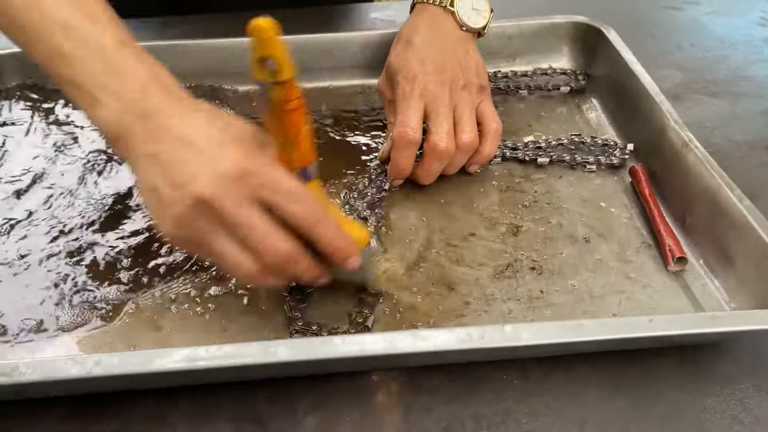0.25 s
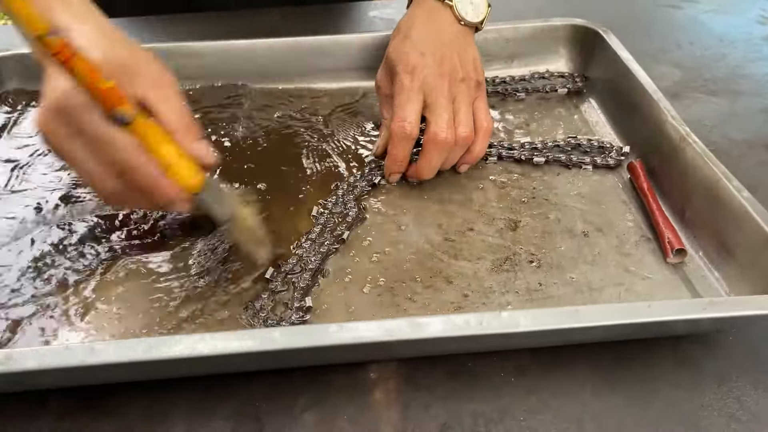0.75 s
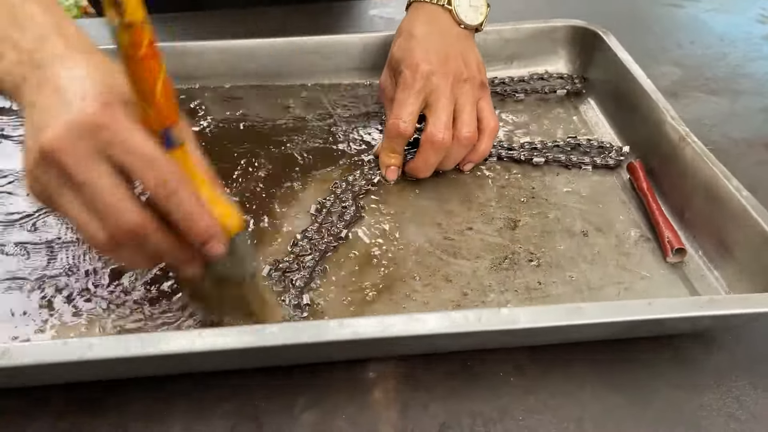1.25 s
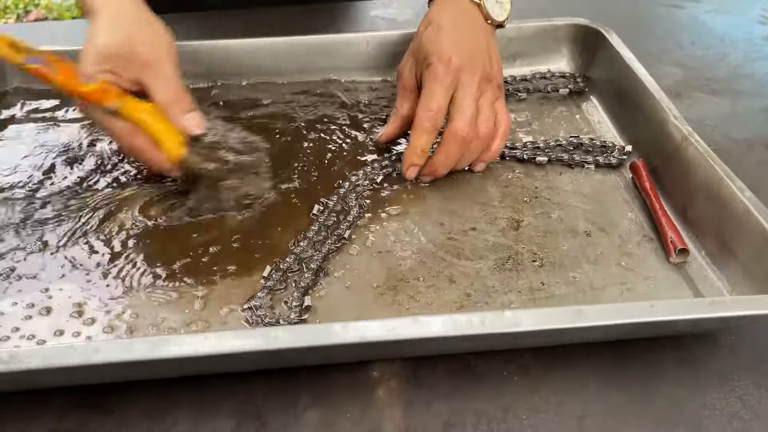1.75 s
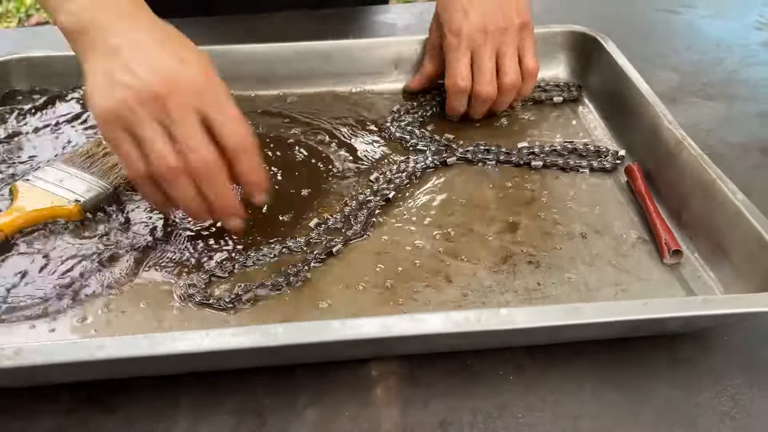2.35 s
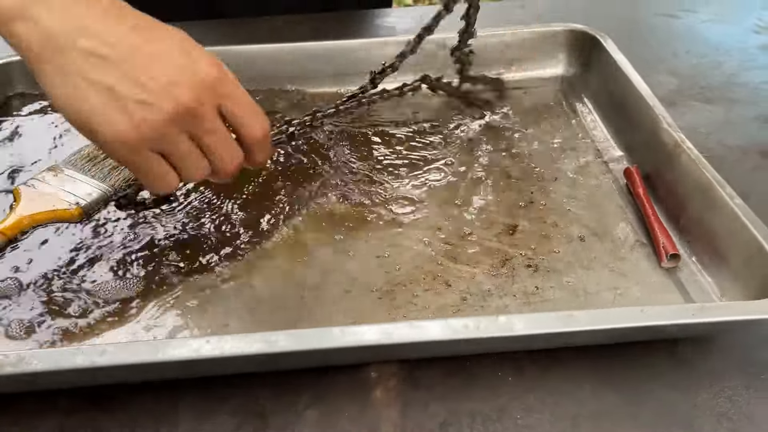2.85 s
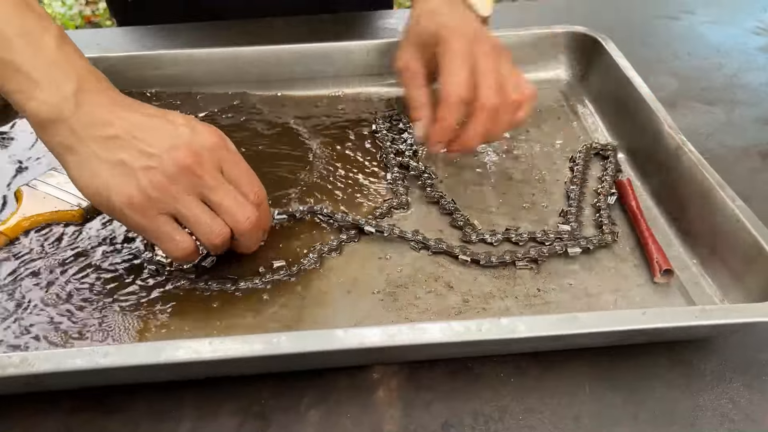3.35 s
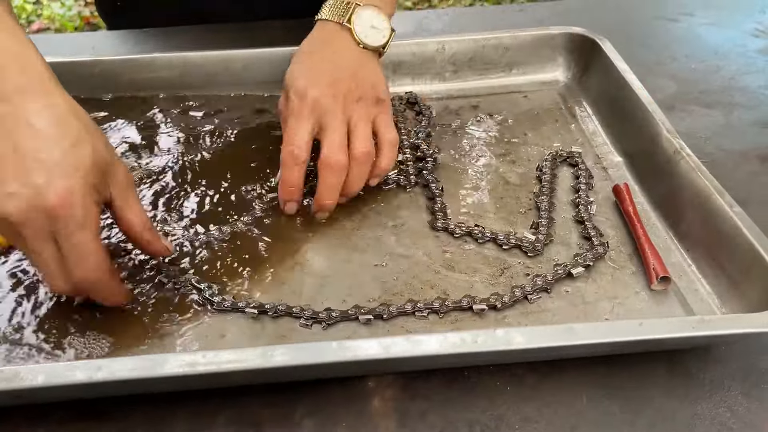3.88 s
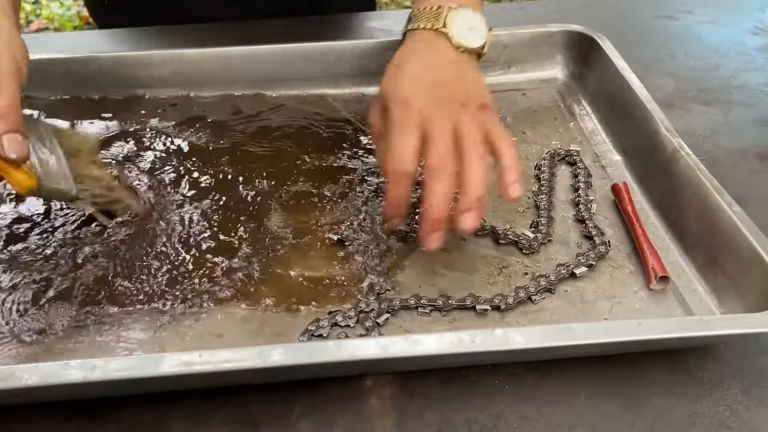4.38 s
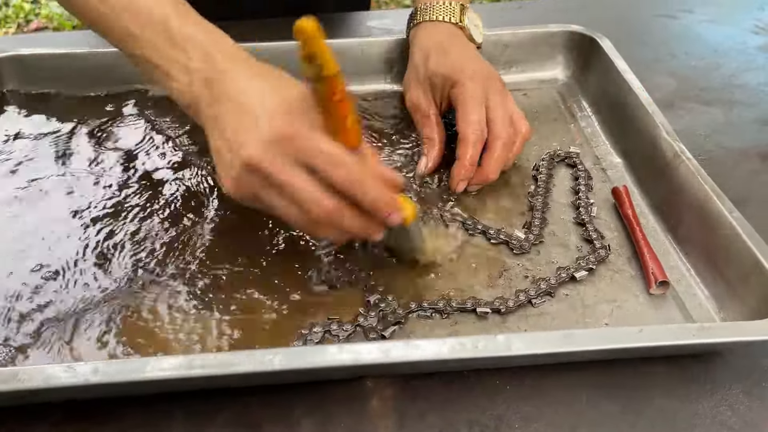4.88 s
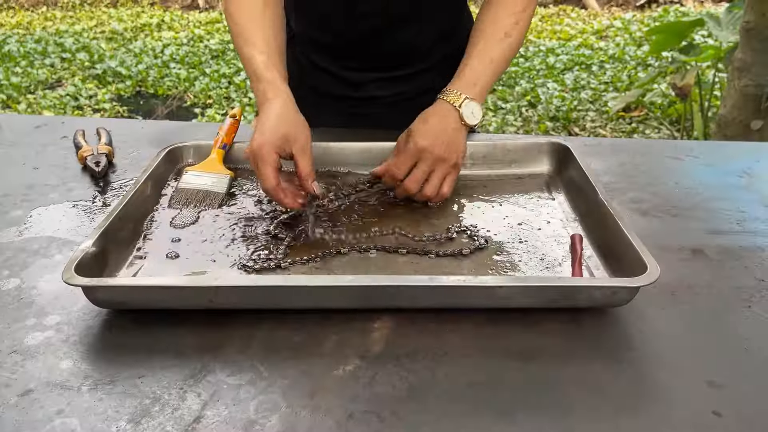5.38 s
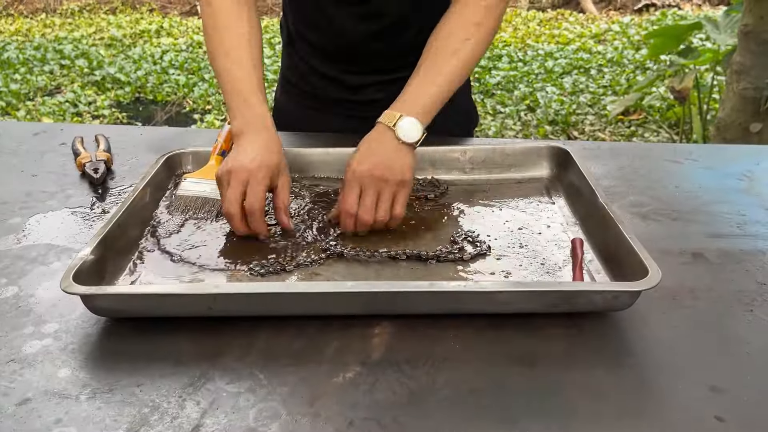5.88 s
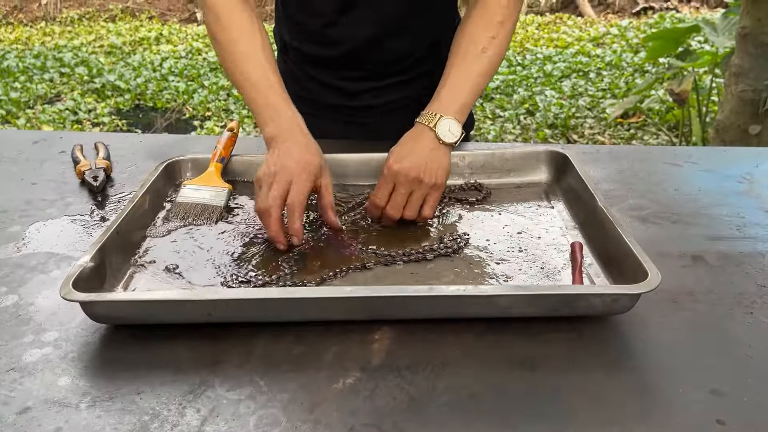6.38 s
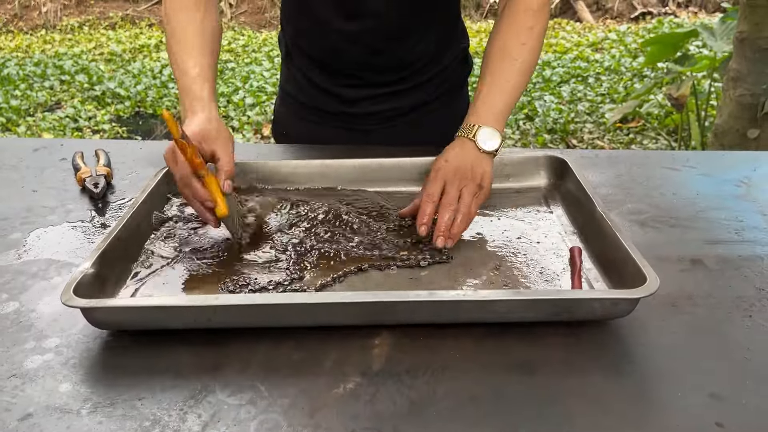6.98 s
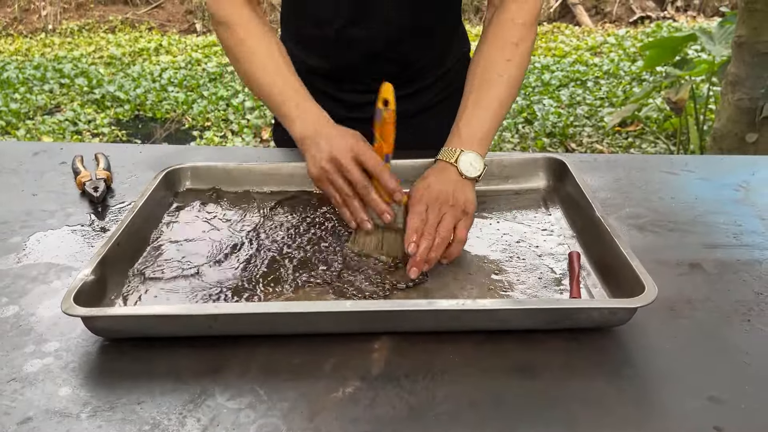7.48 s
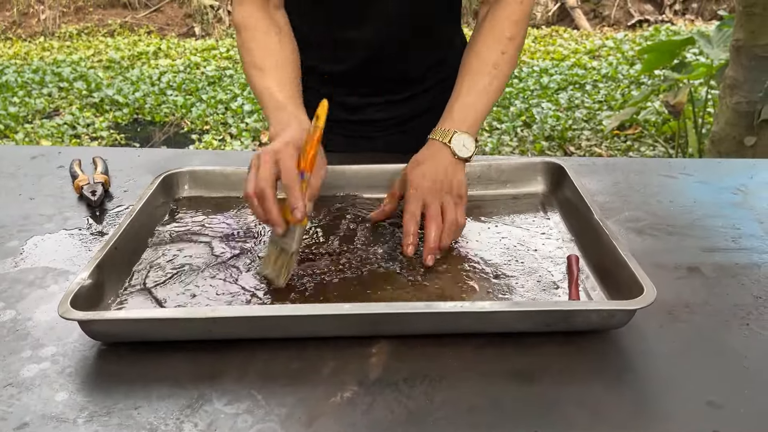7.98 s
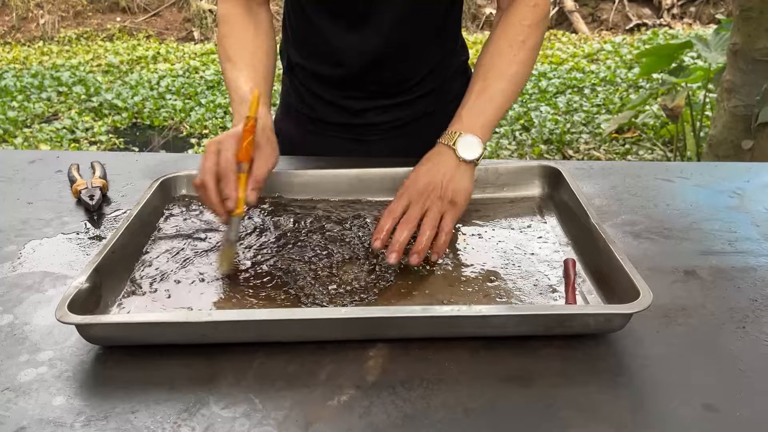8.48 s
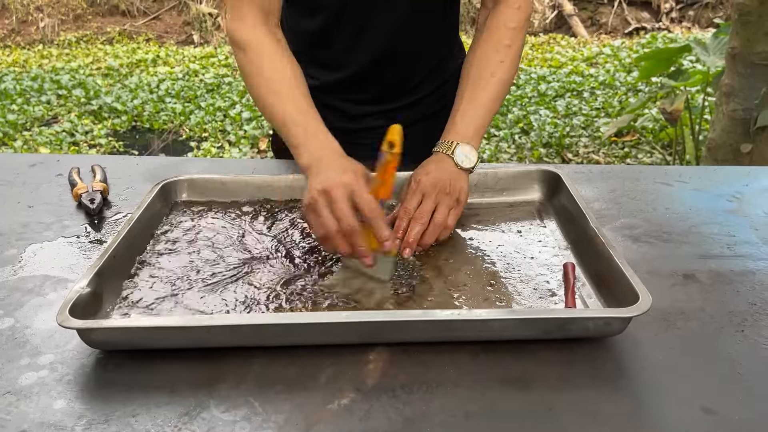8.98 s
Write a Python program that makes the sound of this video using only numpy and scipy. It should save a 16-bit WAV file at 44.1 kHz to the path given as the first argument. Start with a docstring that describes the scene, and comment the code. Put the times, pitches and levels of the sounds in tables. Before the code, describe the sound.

Bristles swish over wet chain links in a thin steel tray, with fine metallic ticks, dull short tray rings and small bubbling plops. Early strokes are light; around two to four seconds the chain clatters as it is moved. Later the scrubbing is steadier and stronger, leaning slightly right, and one faint thin peep passes. Close microphones in open air, with soft rumble and wind.

```python
"""Scrubbing a chain in a wet tray

A stiff brush scrubs a chain in a steel tray of shallow liquid outdoors, and hands drag and drop the chain.
Dense random clicks drive damped modes of the tray floor and of the links and bristles; knocks stand out.
Bubbles are short rising tones, the slosh is low noise; a bird or insect peeps once, a throbbing sine.
Far rumble and wind are shaped noise; the level dips briefly once, as the balance moves from left to right."""
import sys
import numpy as np
from scipy import signal
from scipy.fft import rfft, irfft, next_fast_len
from scipy.io import wavfile

SR = 44100
rng = np.random.default_rng(int(sys.argv[2]) if len(sys.argv) > 2 else 0)


def dump(signal):
    """Clip the signal to [-1, 1] and save it as 16-bit WAV at the path in sys.argv[1]."""
    limited = np.clip(np.atleast_2d(signal).T, -1, 1)
    pcm = np.round(limited * 32767).astype(np.int16)
    wavfile.write(sys.argv[1], SR, pcm)


N = 407484

# links and brush ferrule knocking the tray:
# (time [s], relative peak of the tray ring [dB], relative peak of the link ticks [dB])
KNOCK_EVENTS = [(0.384, -11.5, -21), (0.826, -18, -33), (1.044, -15, -23.5), (1.117, -26.5, -35),
                (1.245, -14.5, -34), (1.338, -24, -42), (1.642, -25.5, -53), (1.748, -33, -53),
                (2.29, -5, -15.5), (2.333, -8.5, -40), (2.406, -16.5, -32), (2.483, -15.5, -25),
                (3.034, -4.5, -15), (3.113, -24, -29), (3.168, -12.5, -21), (3.204, -6, -13),
                (3.255, -10, -20.5), (3.305, -17, -28), (3.325, -12.5, -21), (3.725, -35, -23.5),
                (3.781, -11, -13), (4.135, -11.5, -16), (4.221, -28.5, -49), (4.257, -22.5, -45),
                (4.288, -26.5, -47), (4.314, -28, -29), (4.732, -18.5, -29), (5.184, -6, -13.5),
                (5.327, -18.5, -34), (5.398, -14, -25), (5.503, -7.5, -18), (6.145, -11.5, -19.5),
                (6.773, -19.5, -32.5), (7.2, -22, -32.5), (7.537, -13.5, -18), (7.565, -15.5, -25.5),
                (7.734, -15, -29), (8.176, -16.5, -20.5), (8.722, -14.5, -20)]


def scrubbing():
    """Modal excitation: the same contacts drive two resonators, the tray floor and the links."""
    # modal energy of the tray floor and of the links: (frequency [Hz], relative level [dB per Hz])
    tray_spectrum = [(120, -23), (200, -12), (379, -10.5), (512, 1.5), (661, -7.5), (805, 5.5), (992, -0.5),
                     (1100, 4.5), (1580, 0), (1730, -3), (3200, -19), (4160, -51), (7040, -120)]
    link_spectrum = [(1410, 0.5), (2400, -6), (2660, -6), (5640, -9), (10500, -5.5), (11100, -5),
                     (12400, -16), (14900, -11.5), (15900, -22)]
    # reverberation times, the tray's shortened by the liquid: (frequency [Hz], 60 dB decay time [s])
    tray_decay = [(200, 0.13), (1000, 0.061), (3200, 0.011)]
    link_decay = [(2400, 0.1), (8000, 0.032), (15700, 0.028)]
    ring_db, tick_db = stroke_levels()
    slips = contacts(per_s=4000, spread_db=4.5, clump_db=2.5)
    spot = spots(moves_per_s=300)
    tray = responses(tray_spectrum, tray_decay, count=300, size=4096)
    links = responses(link_spectrum, link_decay, count=900, size=1536)
    _, ring_peak_db, tick_peak_db = np.transpose(KNOCK_EVENTS)
    tray_drive = slips * from_db(ring_db) + knocks(ring_peak_db - 4.5, tray, rattle_s=0.016)
    link_drive = slips * from_db(tick_db) + knocks(tick_peak_db + 4, links, rattle_s=0.014)
    return excite(tray_drive, spot, tray) + excite(link_drive, spot, links)


def stroke_levels():
    """Friction level follows speed: bell-shaped strokes, ticks falling off faster; overlaps add in power."""
    # brush strokes and drags of the chain: (time of the fastest moment [s], rise [s], fall [s],
    # tray ring level [dB], link and bristle tick level [dB])
    strokes = [(0, 0.03, 0.092, -28.5, -26), (0.139, 0.074, 0.23, -34, -32.5),
               (0.293, 0.068, 0.22, -31, -31), (0.393, 0.032, 0.047, -34, -24),
               (0.607, 0.29, 0.087, -36, -34.5), (0.769, 0.058, 0.19, -33.5, -38),
               (1.016, 0.11, 0.11, -34.5, -34), (1.25, 0.083, 0.09, -34, -34),
               (1.557, 0.17, 0.08, -40.5, -36), (1.754, 0.03, 0.2, -52, -42.5),
               (1.961, 0.23, 0.222, -45.5, -48.5), (2.068, 0.1, 0.18, -31.5, -27.5),
               (2.3, 0.032, 0.043, -29.5, -26.5), (2.345, 0.019, 0.03, -25, -32),
               (2.498, 0.18, 0.061, -37.5, -41), (2.604, 0.046, 0.043, -29.5, -28.5),
               (2.697, 0.066, 0.026, -31, -30), (2.787, 0.067, 0.17, -32.5, -24),
               (3.046, 0.019, 0.052, -21.5, -30), (3.162, 0.18, 0.37, -33, -33.5),
               (3.345, 0.03, 0.029, -19, -21.5), (3.44, 0.016, 0.12, -34, -39),
               (3.637, 0.11, 0.23, -29.5, -34.5), (3.785, 0.089, 0.032, -25.5, -21),
               (4.042, 0.093, 0.15, -27, -22), (4.228, 0.015, 0.11, -40, -48),
               (4.36, 0.071, 0.16, -29.5, -19.5), (4.527, 0.015, 0.24, -50.5, -47.5),
               (4.832, 0.12, 0.055, -26.5, -22), (5.013, 0.081, 0.07, -29.5, -23),
               (5.115, 0.04, 0.066, -39, -52), (5.19, 0.064, 0.08, -26, -28),
               (5.431, 0.21, 0.088, -36.5, -40), (5.515, 0.029, 0.089, -19.5, -23),
               (5.71, 0.12, 0.021, -32.5, -31.5), (5.794, 0.091, 0.12, -27.5, -25),
               (5.978, 0.052, 0.52, -33, -36), (6.168, 0.02, 0.035, -23, -24),
               (6.343, 0.14, 0.04, -29.5, -26.5), (6.564, 0.3, 0.067, -32.5, -32),
               (6.828, 0.064, 0.12, -28, -23.5), (7.073, 0.098, 0.12, -29.5, -26),
               (7.237, 0.04, 0.11, -25, -20), (7.445, 0.07, 0.23, -34.5, -35.5),
               (7.55, 0.089, 0.057, -28, -31), (7.765, 0.043, 0.4, -29.5, -26),
               (7.944, 0.22, 0.083, -26.5, -22.5), (8.19, 0.16, 0.3, -27.5, -30),
               (8.395, 0.06, 0.045, -22.5, -22), (8.431, 0.17, 0.1, -29, -33),
               (8.649, 0.051, 0.2, -29.5, -30), (8.799, 0.19, 0.24, -30.5, -30),
               (9.095, 0.071, 0.15, -30, -30.5)]
    ring_swing_db, tick_swing_db = 20.5, 27.5   # below the peak at one rise before it or one fall after it
    rest_ring_db, rest_tick_db = -74.5, -65   # liquid and links never lie quite still
    curve = 2.05   # exponent; 2 = Gaussian bell in time
    peak_s, rise, fall, ring_db, tick_db = np.array(strokes).T[:, :, None]
    t = np.arange(0, N + 64, 64) / SR
    before = (peak_s - t) / np.maximum(rise, 0.005)
    after = (t - peak_s) / np.maximum(fall, 0.005)
    away = np.where(t < peak_s, before, after) ** curve
    layers = (ring_db, ring_swing_db, rest_ring_db), (tick_db, tick_swing_db, rest_tick_db)
    levels = []
    for top, swing, rest in layers:
        power = np.sum(from_db(top - swing * away) ** 2, axis=0) + from_db(rest) ** 2
        levels.append(np.interp(np.arange(N) / SR, t, 10 * np.log10(power)))
    return levels


def contacts(per_s, spread_db, clump_db):
    """Stick-slip as random impulses: slips of bristles and links, uneven in size, in clumps; rms 1."""
    sizes = from_db(spread_db * np.minimum(rng.exponential(1, N), 3.5))
    signs = rng.choice([-1, 1], N)
    happens = rng.random(N) < per_s / SR
    clumps = from_db(clump_db * drift(corner_hz=45))
    return rms_one(sizes * signs * happens * clumps)


def knocks(level_db, rings, rattle_s):
    """Multiple impact: neighbouring links land one after another, swelling quickly, then dying."""
    hardest, fall_db = 0.11, 11.5   # share of the rattle at its hardest; loss over one rattle length [dB]
    jitter = rng.uniform(0, 1, (len(KNOCK_EVENTS), 8))
    jitter[:, 0] = 0   # the first click is on time
    lags = (np.arange(8) + jitter) / 8
    at = ((np.array(KNOCK_EVENTS)[:, :1] + rattle_s * lags) * SR).astype(int)
    clicks = np.zeros(N)
    np.add.at(clicks, np.minimum(at, N - 1), from_db(level_db[:, None] - fall_db * np.abs(lags - hardest)))
    return clicks / np.abs(rings).max(axis=-1).mean()


def spots(moves_per_s):
    """A moving point of excitation: the contact stays on one spot for a moment, then moves on."""
    moves = np.cumsum(rng.random(N) < moves_per_s / SR)
    return rng.integers(0, 12, N)[moves]


def responses(spectrum, t60s, count, size):
    """Modal superposition, evenly dense as in a plate: twelve spots heard left and right, each of energy 1."""
    low, high = spectrum[0][0], spectrum[-1][0]
    hz = (low + (high - low) * (np.arange(count) + rng.random(count)) / count)[:, None]
    t, t60 = np.arange(size) / SR, at_hz(t60s, hz)
    decay = from_db(at_hz(spectrum, hz) - 60 * t / t60) / np.sqrt(t60)   # energy does not depend on t60
    modes = decay * np.exp(2j * np.pi * hz * t)
    # each spot drives some modes far more, and each microphone meets them in another phase
    drive = from_db(rng.normal(0, 2.0, (12, 1, count)))
    shapes = rng.standard_normal((12, 2, count)) + 1j * rng.standard_normal((12, 2, count))
    onset = np.minimum(t / 0.00019, 1)
    rings = ((drive * shapes) @ modes).real * onset
    return rings / np.sqrt(np.sum(rings ** 2, axis=2, keepdims=True))


def excite(clicks, spot, rings):
    """Convolution: every click rings with the impulse response of its spot."""
    size = next_fast_len(N + rings.shape[-1])
    total = sum(rfft(clicks * (spot == k), size) * rfft(ring, size) for k, ring in enumerate(rings))
    return irfft(total, size)[:, :N]


def splashing(per_s, level_db):
    """Bubble resonance: small bubbles follow the strokes in level; a few large ones stand alone."""
    # air pockets closing in the liquid: (time [s], peak level [dB], starting frequency [Hz])
    plops = [(1.044, -12.5, 1076), (1.879, -41, 3030), (1.906, -38, 1440), (1.907, -36, 2300),
             (1.936, -37, 770), (1.958, -32, 795), (5.184, -12, 875), (7.058, -24, 960), (8.381, -24, 1360)]
    out = np.zeros((2, N + SR))
    stroke_db = stroke_levels()[0] + level_db
    rows = [(int(s * SR), peak_db, hz, 16.0) for s, peak_db, hz in plops]
    for when, size, pitch in rng.random((int(per_s * N / SR), 3)):
        at = int(when * N)
        rows.append((at, stroke_db[at] - 14 * size, 600 * 6.0 ** pitch, 11.0))
    for at, peak_db, hz, cycles in rows:
        tone = bubble(from_db(peak_db), hz, cycles)
        out[:, at:at + tone.shape[1]] += tone
    return out[:, :N]


def bubble(peak, hz, cycles):
    """A pulsating bubble: a short tone rising in pitch as it dies, in another phase at each microphone."""
    age = np.arange(int(cycles / hz * SR)) * hz / SR / cycles   # 0 to 1 over its life
    turns = cycles * age * (1 + 0.049 * age) + rng.random((2, 1))
    envelope = np.sin(np.pi * age ** 0.46) ** 2   # quick swell, slow fall
    return peak * envelope * np.sin(2 * np.pi * turns)


def slosh():
    """Flexure of the tray under moving liquid: a dull, lumpy wobble of low band noise."""
    # wobble before its random lumps: (time [s], level [dB])
    slosh_level = [(5.22, -62), (5.34, -41.5), (5.432, -30.5), (5.6, -41.5), (5.75, -57)]
    band = signal.butter(2, [100, 260], "band", fs=SR, output="sos")
    noise = rms_one(signal.sosfilt(band, rng.standard_normal((2, N))))
    lumps = from_db(4.0 * drift(corner_hz=25.0))
    return burst(slosh_level) * lumps * noise


def peep():
    """Frequency and amplitude modulation: a thin, slightly throbbing tone."""
    # peak of the peep before its throbbing: (time [s], level [dB])
    peep_level = [(6.63, -73), (6.66, -58), (6.715, -60), (6.735, -74), (6.77, -81)]
    hz = 2980 * (1 + 0.0037 * drift(corner_hz=38.0))
    channel_phase = np.array([[0], [1.5]])   # rad
    tone = np.sin(2 * np.pi * np.cumsum(hz) / SR + channel_phase)
    return burst(peep_level) * from_db(2.5 * drift(corner_hz=24.0)) * tone


def outdoors():
    """Partial coherence: far rumble and air partly shared by both microphones, lumpy wind own to each."""
    # spectrum of rumble and air: (frequency [Hz], relative level [dB per Hz])
    rumble_spectrum = [(12, -28), (20, -5.5), (70, 16), (618, -8.5), (1110, -28), (4600, -21), (10600, -73),
                       (15700, -41)]
    # background: (time [s], rumble level before its slow drift [dB], level of wind on the microphones [dB])
    background_level = [(0, -45.5, -44), (5.12, -46.5, -48.5), (5.17, -62, -53), (5.8, -48, -72),
                        (9.24, -46.5, -52)]
    rumble_db, wind_db = in_time(background_level)
    hz = np.maximum(np.fft.rfftfreq(N, 1 / SR), 1)
    white = rng.standard_normal((2, N)) + 0.56 * rng.standard_normal(N)   # own part + shared part
    air = rms_one(irfft(rfft(white) * from_db(at_hz(rumble_spectrum, hz)), N))
    band = signal.butter(2, [30, 75], "band", fs=SR, output="sos")
    wind = signal.sosfilt(band, rng.standard_normal((2, N)))
    gusty = rms_one(wind * from_db(6 * drift(corner_hz=6.2)))
    return air * from_db(rumble_db + 2.6 * drift(corner_hz=11.6)) + gusty * from_db(wind_db)


def drift(corner_hz):
    """Low-passed noise (two equal poles): a slow random curve of spread about 1."""
    r = np.exp(-2 * np.pi * corner_hz * 40 / SR)   # one value every 40 samples
    slow = signal.lfilter([1], [1, -2 * r, r * r], rng.standard_normal(N // 40 + 2002))[2000:]
    return np.interp(np.arange(N) / 40, np.arange(len(slow)), rms_one(slow))


def from_db(db):
    """Decibel law: amplitude gain of a level."""
    return 10 ** (np.asarray(db) / 20)


def rms_one(x):
    """Power normalisation: scale to unit rms."""
    return x / np.sqrt(np.mean(x ** 2) + 1e-20)


def in_time(rows):
    """Linear interpolation: the columns of a curve at every sample."""
    s, *columns = np.transpose(rows)
    return [np.interp(np.arange(N) / SR, s, c) for c in columns]


def burst(rows):
    """Envelope: gain of a level curve that is silent outside its span."""
    s, db = np.transpose(rows)
    return from_db(np.interp(np.arange(N) / SR, s, db, left=-200, right=-200))


def at_hz(points, hz):
    """Logarithmic pitch: read a spectrum on a log-frequency axis."""
    points_hz, values = np.transpose(points)
    return np.interp(np.log(hz), np.log(points_hz), values)


def scene():
    """Stereo by level difference: all sources but the background lean left at first, right later."""
    # balance: (time [s], left minus right [dB])
    balance = [(0, .7), (5.1, 1.3), (5.2, -1.7), (9.24, -1.7)]
    lean = from_db(in_time(balance)[0] / 2 * np.array([[1], [-1]]))
    near = scrubbing() + splashing(per_s=60, level_db=1.5) + slosh() + peep()
    return lean * near + outdoors()


def record(dry):
    """Gating, saturation and low-pass: the level dips briefly, peaks are rounded, the top is cut."""
    t = np.arange(N) / SR
    start, end = 5.130, 5.158   # dip [s]
    fades = np.maximum((start - t) / 0.0011, (t - end) / 0.004)
    gate = np.clip(fades, from_db(-22), 1)
    low_pass = signal.cheby2(20, 50, 16000, fs=SR, output="sos")   # 50 dB down from 16 kHz up
    return signal.sosfilt(low_pass, np.tanh(dry * gate))


dry = scene()
out = record(dry)
dump(out)
```